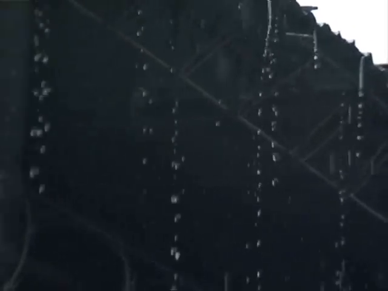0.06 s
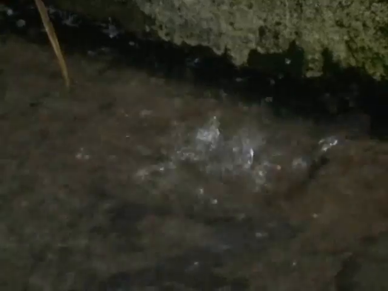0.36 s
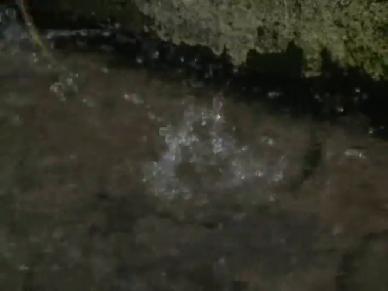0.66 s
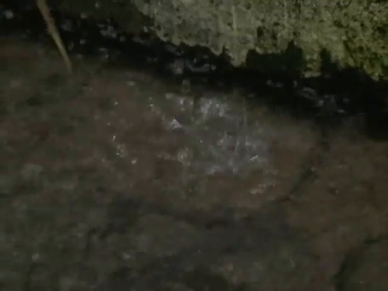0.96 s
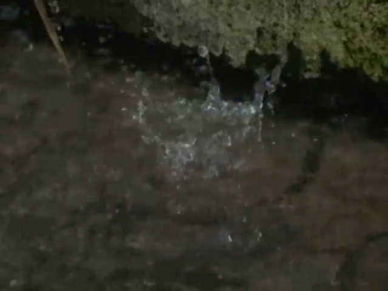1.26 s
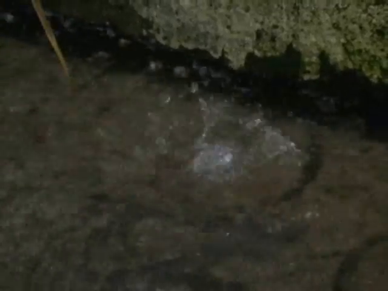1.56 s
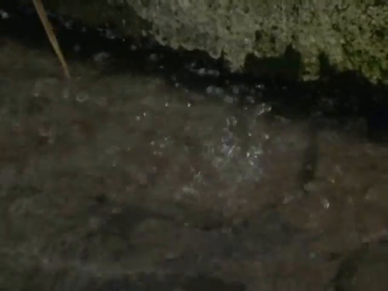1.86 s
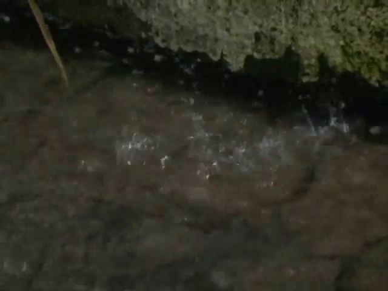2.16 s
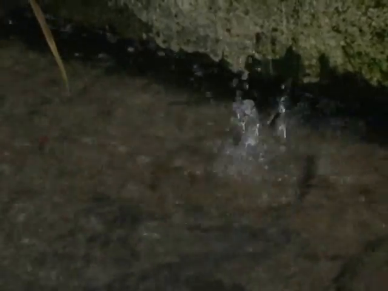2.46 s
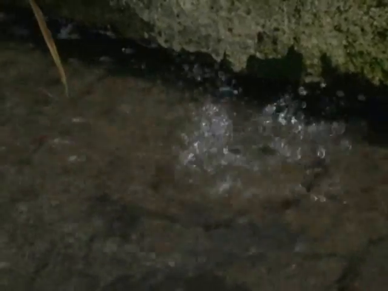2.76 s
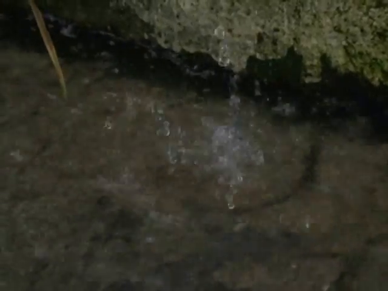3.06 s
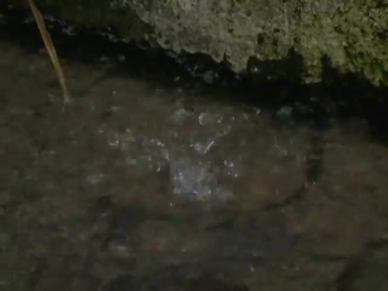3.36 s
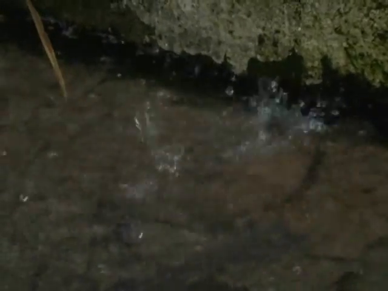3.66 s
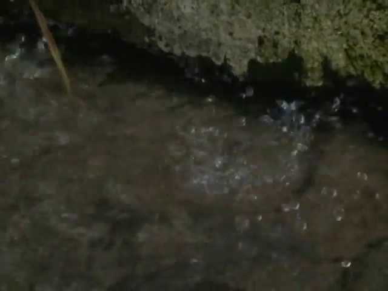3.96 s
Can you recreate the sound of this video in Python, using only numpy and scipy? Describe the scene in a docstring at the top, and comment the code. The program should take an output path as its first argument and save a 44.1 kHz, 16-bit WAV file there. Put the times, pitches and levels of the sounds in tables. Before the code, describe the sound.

Rain patters and rumbles on an outdoor shelter, heard from underneath and almost entirely on the left. After a short electrical crackle on the right, close drops thump irregularly, water splashes on stone and a far engine hums faintly.

```python
"""Rain on a shelter

Rain drums on a shelter overhead while runoff splashes on wet stone and makes small bubbles.
Single heavy drops tap and thump close by, and a distant engine hums, slowly rising in pitch.
Nearly all of it is on the left: the right channel sizzles and pops like a wet contact
for a moment, then leaves only faint hiss and mains buzz."""
import sys
import numpy as np
from scipy.fft import rfft, irfft, next_fast_len
from scipy.io import wavfile
from scipy.ndimage import uniform_filter1d, map_coordinates

SR = 44100
rng = np.random.default_rng(int(sys.argv[2]) if len(sys.argv) > 2 else 0)


def store_pcm(level_fs):
    """Save levels as 16-bit WAV."""
    pcm = np.round(np.clip(level_fs, -1, 1) * 32767).astype(np.int16)
    wavfile.write(sys.argv[1], SR, np.atleast_2d(pcm).T)


N = 4 * SR


def amp(db):
    """Turn decibels into a number to multiply a sound by."""
    return 10 ** (np.asarray(db) / 20)


def unit(x):
    """Scale a signal so that its average strength (rms) is 1."""
    return x / np.sqrt(np.mean(x ** 2) + 1e-20)


def along(points, hz):
    """Read between (frequency, value) points on a logarithmic frequency scale."""
    freqs, values = np.transpose(points)
    return np.interp(np.log(hz + 1), np.log(freqs + 1), values)


def curves(rows):
    """Turn rows that start with a time into one curve for each further column."""
    times, *columns = np.transpose(rows)
    return [np.interp(np.arange(N) / SR, times, column) for column in columns]


def wobble(per_s):
    """A smooth curve through per_s random values a second."""
    return map_coordinates(rng.standard_normal(1000), [np.arange(N) * per_s / SR], mode="mirror")


def filtered(x, response):
    """Multiply each frequency in x by response(frequency)."""
    size = next_fast_len(len(x) + SR // 4)
    return irfft(rfft(x, size) * response(np.fft.rfftfreq(size, 1 / SR)), size)[:len(x)]


def resonant_noise(samples, hz, width_hz):
    """Noise sent twice through a resonance, which favours the frequencies near hz."""
    def response(f):
        return (1j * f * width_hz / (hz * hz - f * f + 1j * f * width_hz)) ** 2
    return unit(filtered(rng.standard_normal(samples), response))


def noise(spectrum, grain_db=0, grain_samples=40):
    """Noise shaped by a spectrum (the level in each 1 Hz band); grain_db makes it grainy."""
    clumps = amp(grain_db * unit(uniform_filter1d(rng.standard_normal(N), grain_samples)))
    white = unit(rng.standard_normal(N) * clumps)
    return filtered(white, lambda f: amp(along(spectrum, f))) * np.sqrt(SR / 2)


def add(out, start_s, sound):
    """Mix a sound into out at the given time."""
    part = out[max(0, round(start_s * SR)):][:len(sound)]
    part += sound[:len(part)]


def envelope(fade_s, rise_s):
    """Times and a loudness shape: a quick rise, and a fall of 60 dB every fade_s."""
    t = np.arange(SR // 8) / SR
    return t, np.exp(-np.log(1000) * t / fade_s) * (1 - np.exp(-t / rise_s))


def ring(hz, fade_s, rise_s, glide=0):
    """A fading tone whose pitch slides by glide times its starting pitch each second."""
    t, shape = envelope(fade_s, rise_s)
    return shape * np.sin(2 * np.pi * hz * t * (1 + glide * t / 2))


def hiss_and_buzz(mains_hz=59.9, count=100):
    """Faint hiss, steady buzz at multiples of the mains frequency, and a thin whine on top."""
    # steady hiss: f/Hz, level/dB
    hiss_spectrum = [(20, -74), (50, -67), (100, -86), (200, -103), (400, -103), (700, -100), (2000, -95),
                     (4000, -103), (8000, -108.5), (16000, -111.5)]
    # typical strength of the weaker buzz tones: f/Hz, level/dB
    weak_tones = [(300, -67), (600, -75), (800, -73), (1200, -77.5), (2000, -80), (3200, -84), (4000, -89),
                  (6000, -89)]
    # strong buzz tones: multiple of the mains frequency, level/dB
    strong_tones = [(1, -58), (2, -57), (3, -60.5), (4, -60), (6, -56), (8, -69), (12, -66), (14, -79),
                    (24, -68.5), (36, -67.5), (48, -73)]
    # very high tones: f/Hz, level/dB
    whine = [(11205, -89), (11265, -90), (14955, -82), (15015, -85)]
    hiss = noise(hiss_spectrum)
    t = np.arange(N) / SR
    freqs = mains_hz * np.arange(1, count + 1)
    levels = along(weak_tones, freqs) + 2.5 * rng.standard_normal(count)
    for multiple, db in strong_tones:
        levels[round(multiple) - 1] = db
    tones = list(zip(freqs, levels)) + whine
    buzz = sum(amp(db) * np.sin(2 * np.pi * (hz * t + rng.random())) for hz, db in tones)
    return hiss + np.sqrt(2) * buzz


def sizzle(end_s=0.285, fall_db_per_s=4500):
    """A sizzle like a wet electrical contact swells, pops and stops dead."""
    # bright crackle: f/Hz, level/dB
    crackle_spectrum = [(150, -93), (500, -67), (1000, -71.5), (2000, -77), (2700, -77.5), (5000, -82),
                        (10000, -87), (16000, -90)]
    # low flutter under it: f/Hz, level/dB
    flutter_spectrum = [(20, -60), (90, -57), (220, -60), (450, -66), (1000, -90), (2000, -120)]
    # how the sizzle grows: t/s, level/dB
    swell = [(0, -1), (.1, 1), (.17, 3), (.23, 6.5), (.264, 8), (.272, 17.5), (.279, 7.5), (.286, 18)]
    # sharp pops: t/s, level/dB
    pops = [(0.2675, -23), (0.2736, -4), (.275, -1.5), (0.2841, -3)]
    swell_db, = curves(swell)
    crackle = noise(crackle_spectrum, grain_db=3, grain_samples=12) * amp(swell_db)
    flutter = noise(flutter_spectrum) * amp(0.55 * swell_db)
    past_end_s = np.maximum(np.arange(N) / SR - end_s, 0)
    out = (crackle + flutter) * amp(-fall_db_per_s * past_end_s)
    _, pop = envelope(fade_s=0.0031, rise_s=0.00002)
    for start, db in pops:
        add(out, start, amp(db) * pop)
    return out


def engine(waver_db=2):
    """A far engine hums higher as it gathers speed; each of its tones wavers on the way here."""
    # firing rate and loudness: t/s, f/Hz, level/dB
    run = [(0, 96, -46), (.45, 101, -37.5), (.9, 103, -37), (1.3, 106, -38.5), (1.6, 109, -37.5),
           (1.95, 112.5, -40), (2.35, 114, -33), (2.65, 115, -43), (3.2, 115.5, -44), (3.55, 117, -40),
           (4, 119.5, -38.5)]
    # tones of the hum: multiple of the firing rate, level/dB
    tones = [(0.501, -10), (.75, -9), (1, 0.5), (1.25, -11.5), (1.5, -4.5), (2, -11)]
    firing_hz, run_db = curves(run)
    cycles = np.cumsum(firing_hz) / SR
    out = np.zeros(N)
    for multiple, db in tones:
        gain = amp(run_db + db + waver_db * wobble(12))
        out += gain * np.sin(2 * np.pi * (multiple * cycles + rng.random()))
    return np.sqrt(2) * out


def spurt(hz, width_hz, fade_s, rise_s):
    """A short spurt of spray: noise around one pitch that dies away quickly."""
    t, shape = envelope(fade_s, rise_s)
    return shape * resonant_noise(len(t), hz, width_hz)


def runoff(droplets_per_s=110):
    """Water hits the stone: fine spray, splashes, snaps, ringing bubbles and pinging droplets."""
    # fine spray: f/Hz, level/dB
    spray_spectrum = [(800, -120), (2000, -85), (3000, -95.5), (4500, -97.5), (7000, -106), (10000, -112),
                      (16000, -114)]
    # splashes on the stone: t/s, level/dB, centre f/Hz
    splashes = [(.006, -42, 5800), (0.048, -36, 6060), (.179, -47, 5200), (.212, -42, 4550),
                (.313, -44, 4020), (.371, -50, 3830), (0.4143, -37, 3260), (0.487, -39.5, 3400),
                (0.655, -45, 5100), (0.682, -42, 3680), (0.873, -43, 4300), (0.9078, -35, 3540),
                (.9455, -45, 4000), (1.085, -46, 4400), (1.4443, -41, 3550), (1.506, -44, 3500),
                (1.6995, -40.5, 3950), (1.8263, -52, 4330), (1.8748, -37, 3530), (1.932, -50, 4840),
                (1.953, -43, 3600), (2.031, -45, 4800), (2.0587, -44, 3860), (2.1445, -43, 4300),
                (2.175, -44, 3500), (2.2548, -40, 3750), (2.271, -50, 4200), (2.3984, -39, 3770),
                (2.678, -33.5, 3480), (2.7915, -46, 3800), (2.9745, -47, 4100), (3.13, -44, 3570),
                (3.271, -44, 4200), (3.301, -36, 3000), (3.303, -45, 5000), (3.597, -49, 3570),
                (3.792, -43, 3700), (3.8438, -37, 2700), (3.93, -42, 3920)]
    # sharp snaps where water slaps bare stone: t/s, level/dB
    snaps = [(.4102, -46), (.464, -53), (0.657, -41.5), (1.0615, -44), (1.0858, -45), (1.418, -49),
             (1.823, -49), (1.933, -47), (3.519, -52), (3.641, -47), (3.695, -49), (3.844, -48)]
    # bubbles in the puddle: t/s, level/dB, starting f/Hz, fade/s, glide/(1/s)
    bubbles = [(1.7005, -29, 815, 0.06, 25.5), (1.502, -30, 1840, .03, 0), (1.996, -32, 3060, 0.018, 0),
               (2.445, -31.5, 1620, 0.033, -4), (3.3, -30, 2530, 0.024, 3), (3.306, -22.5, 858, 0.055, 4.5),
               (3.387, -22.5, 1930, 0.019, -4)]
    out = noise(spray_spectrum, grain_db=2.5, grain_samples=180) * amp(1.5 * wobble(22.06))
    for start, db, hz in splashes:
        add(out, start, amp(db) * spurt(hz, width_hz=0.36 * hz, fade_s=0.016, rise_s=0.00055))
    for start, db in snaps:
        add(out, start, amp(db) * spurt(hz=10300, width_hz=44000, fade_s=0.0071, rise_s=0.00042))
    for start, db, hz, fade_s, glide in bubbles:
        add(out, start, amp(db) * ring(hz, fade_s, rise_s=0.0015, glide=glide))
    droplets = list(zip(rng.random(1200), rng.standard_normal((1200, 2))))
    for when, (size, pitch) in droplets[:int(droplets_per_s * N / SR)]:
        hz = 2240 * np.exp(0.42 * pitch)
        db = -41 + 1.7 * size - 4.5 * pitch  # higher droplets are quieter
        add(out, when * N / SR, amp(db) * ring(hz, fade_s=12.3 / hz, rise_s=0.00021, glide=7.1))
    return out


def tap(hz, samples=1024):
    """The dull click of one drop landing on the shelter, with a peak of 1."""
    # spectrum of a tap pitched at 1500 Hz: f/Hz, level/dB
    spectrum = [(40, -39.5), (200, 2.5), (550, 0.5), (800, -1.5), (1100, 3.5), (1500, 0), (1720, -2.5),
                (2000, -12), (2450, -21.5), (3000, -34), (6500, -45), (16000, -56)]
    gains = amp(along(spectrum, np.fft.rfftfreq(samples, 1 / SR) * 1500 / hz))
    # pack the sound's energy at its start (minimum phase), so it begins like a hit
    cepstrum = irfft(np.log(gains))
    click = irfft(np.exp(rfft(2 * cepstrum[:samples // 2], samples)))
    return click / np.abs(click).max()


def rain_on_shelter(taps_per_s=130):
    """Countless drops make the shelter rumble and drum, under a soft wash with light taps."""
    # how the rain comes and goes: t/s, drumming level/dB, patter level/dB
    rain = [(0, -28, 8.5), (.27, 1, 3), (.31, 3, 0), (.7, 1.5, 0.5), (1.15, 3.5, 0), (1.45, -5.5, 0.5),
            (1.65, 3, 0.5), (1.9, -1.5, 1.5), (2.2, 1.5, 2), (2.45, 3.5, -0.5), (2.7, -3.5, 1),
            (3.2, 4.5, 0), (3.6, 3.5, 0.5), (4, 3, 1.5)]
    # how the deep rumble comes and goes: t/s, level/dB
    rumble_swell = [(0, 2.5), (.3, -0.5), (.55, 4.5), (.9, 2.5), (1.2, 1.5), (1.45, -4.5), (1.8, -7.5),
                    (2.05, -0.5), (2.4, -11), (2.75, -5.5), (3.15, 2), (3.6, -1), (4, -1)]
    # where the shelter rings: f/Hz, base width/Hz, level/dB
    resonances = [(148.06, 6.2, -41.5), (129, 49, -44.5), (166.7, 24.3, -44), (224, 62, -51.5)]
    # deep rumble: f/Hz, level/dB
    rumble_spectrum = [(15, -95), (32, -72), (44, -64), (60, -49.5), (82, -52), (100, -56.5), (200, -100),
                       (500, -120)]
    # wash of drops blurring together: f/Hz, level/dB
    wash_spectrum = [(60, -70), (170, -60.5), (260, -66), (460, -65), (620, -70.5), (850, -73), (1050, -79),
                     (1350, -78), (1800, -78.5), (2100, -88.5), (2450, -85), (3200, -92.5), (5000, -104),
                     (9000, -116), (16000, -120)]
    drum_db, patter_db = curves(rain)
    rumble_db, = curves(rumble_swell)
    drum = sum(amp(db) * resonant_noise(N, hz, 1.32 * width) for hz, width, db in resonances)
    rumble = noise(rumble_spectrum) * amp(rumble_db)
    wash = noise(wash_spectrum, grain_db=-0.5, grain_samples=130) * amp(wobble(23.92))
    taps = np.zeros(N)
    for when, softness, pitch in rng.random((1200, 3))[:int(taps_per_s * N / SR)]:
        db = -41.5 - 2.5 * np.log(softness + 0.056)  # many soft taps, a few louder ones
        add(taps, when * N / SR, amp(db) * tap(hz=1200 + 750 * pitch))
    return rumble + drum * amp(drum_db) + (wash + taps) * amp(patter_db)


def heavy_drops(knock_delay_s=0.00065):
    """Each close drop taps, pings briefly, knocks and sets the shelter thumping."""
    # close drops: t/s, tap level/dB, tap and ping f/Hz, ping level/dB, knock level/dB, thump level/dB
    drops = [(0.0478, -14.5, 1370, -14.5, -35, -18), (0.098, -20.5, 1970, -35, -36, -39),
             (0.1802, -26, 1670, -9, -38, -31), (0.215, -20, 1480, -35, -15, -26),
             (.243, -32, 1500, -35, -21, -17), (0.282, -6, 2070, -34, -39, -46),
             (0.3136, -26.5, 1500, -31, -24, -34), (0.345, -29, 1480, -35, -34, -45),
             (0.4104, -18.5, 1420, -16, -24.5, -17.5), (0.6567, -24, 1330, -12, -44, -11),
             (1.0603, -1, 1400, -29, -5, -5), (1.085, -21, 1530, -22, -42, -26),
             (1.3508, -23, 1560, -19.5, -32, -41), (1.446, -30, 1540, -28, -46, -43),
             (1.629, -27, 1450, -24, -29, -26), (2.0892, -29, 1700, -29, -18, -29),
             (2.173, -27, 1860, -24, -36, -30), (2.38, -31, 970, -22, -39, -38),
             (2.731, -36, 2370, -26, -42, -52), (3.065, -34, 1580, -21, -43, -38),
             (3.305, -22, 1600, -41, -42, -36), (3.73, -29, 1800, -33, -50, -51)]
    # tones of the knock: f/Hz, level/dB, fade/s
    knock_tones = [(495, 2, 0.0082), (843, -9.5, 0.019), (213, -19, 0.053)]
    knock = sum(amp(db) * ring(hz, fade_s, rise_s=0.00013) for hz, db, fade_s in knock_tones)
    thump = ring(hz=114, fade_s=0.077, rise_s=0.0023)
    out = np.zeros(N)
    for start, tap_db, hz, ping_db, knock_db, thump_db in drops:
        add(out, start, amp(tap_db) * tap(hz))
        add(out, start, amp(ping_db) * ring(hz, fade_s=0.0071, rise_s=0.00087))
        add(out, start + knock_delay_s, -amp(knock_db) * knock)
        add(out, start, -amp(thump_db) * thump)
    return out


def scene():
    """Rain and the far engine on the left; sizzle, hiss and buzz on the right."""
    left = rain_on_shelter() + heavy_drops() + runoff() + engine()
    right = sizzle() + hiss_and_buzz()
    return np.array([left, right])


def record(dry):
    """Cut away the very highest treble in both channels."""
    top_hz, slope_hz = 15900, 400
    return np.array([filtered(x, lambda f: np.clip((top_hz - f) / slope_hz, 0, 1)) for x in dry])


dry = scene()
out = record(dry)
store_pcm(out)
```